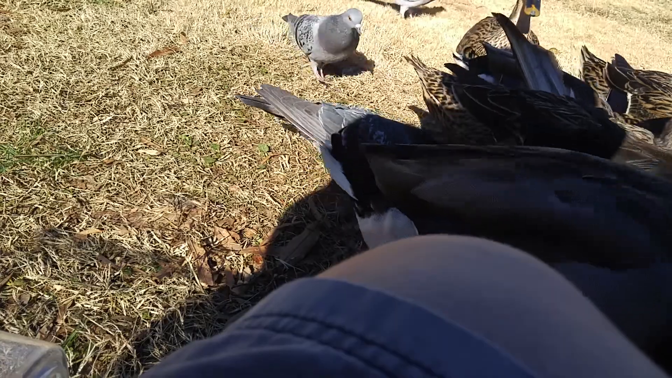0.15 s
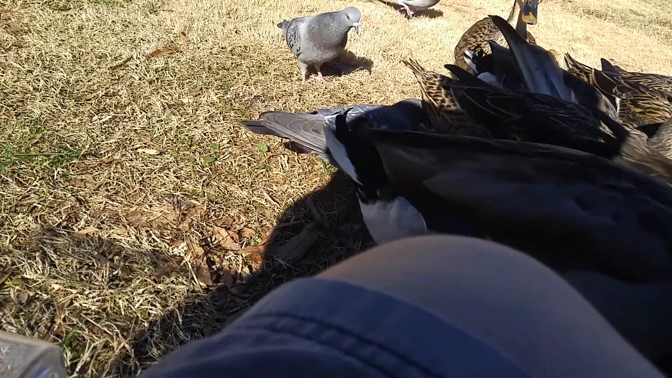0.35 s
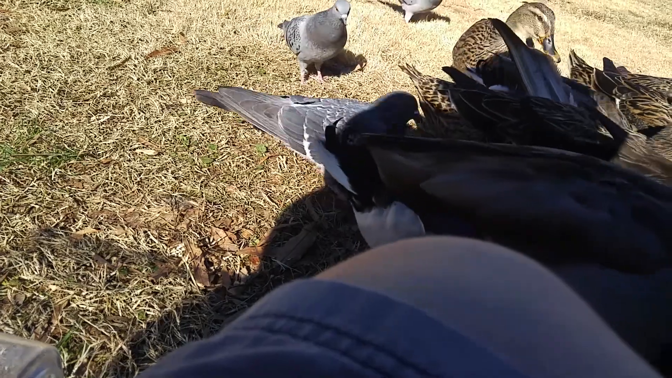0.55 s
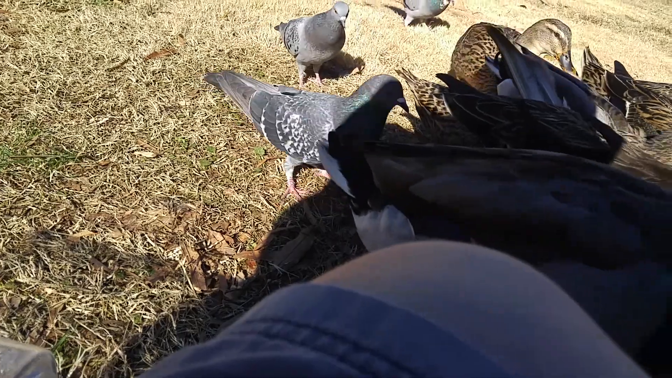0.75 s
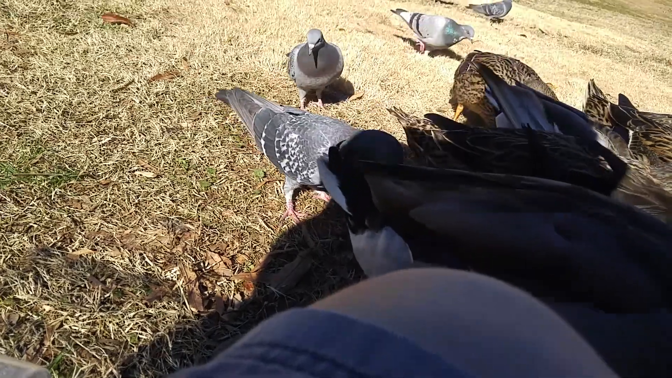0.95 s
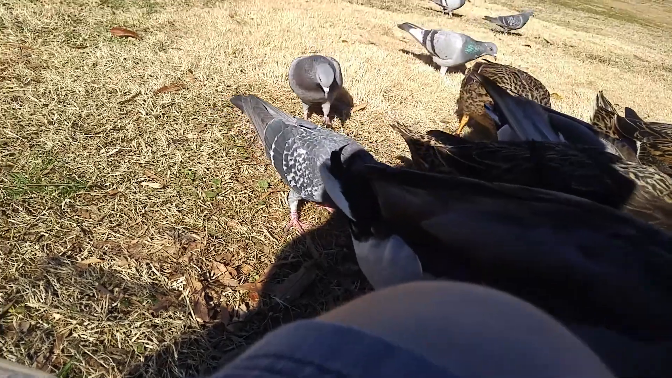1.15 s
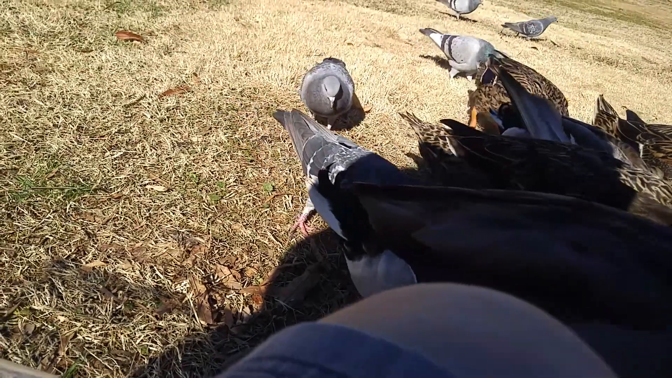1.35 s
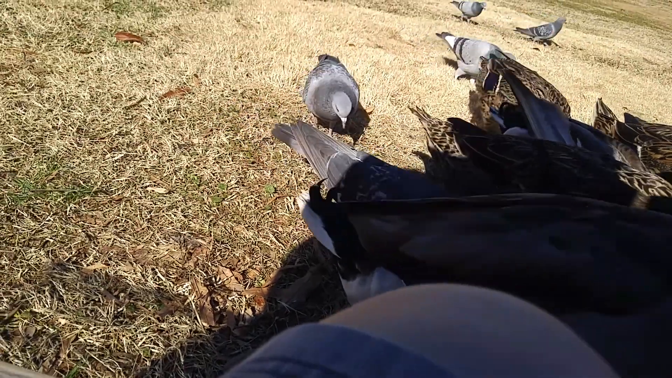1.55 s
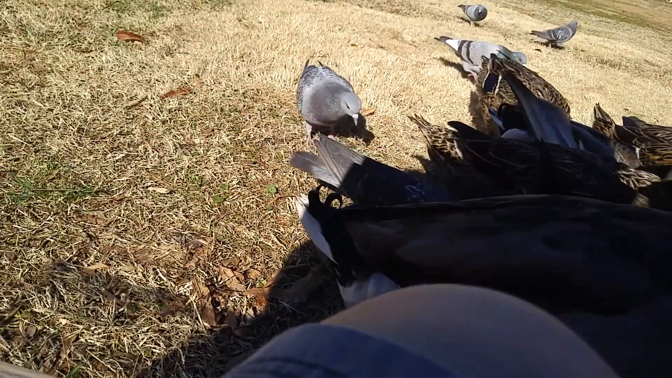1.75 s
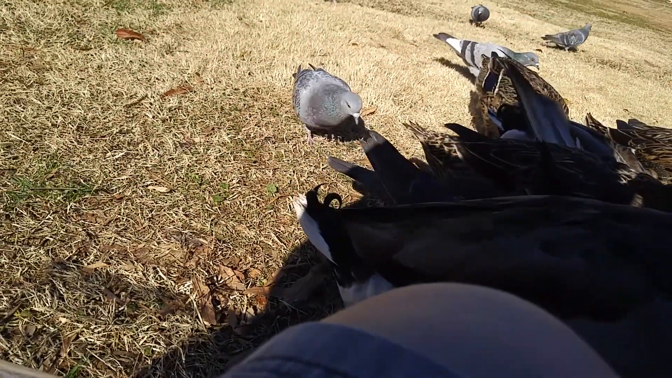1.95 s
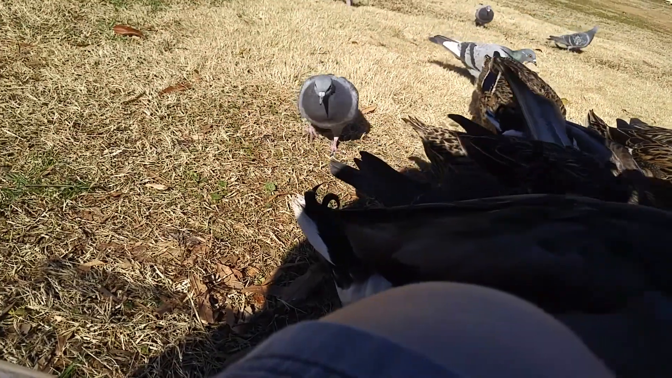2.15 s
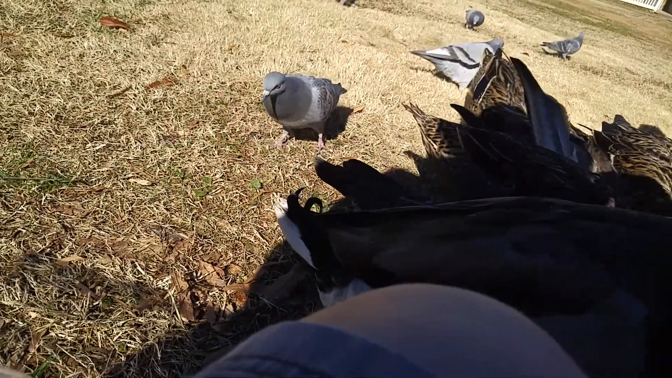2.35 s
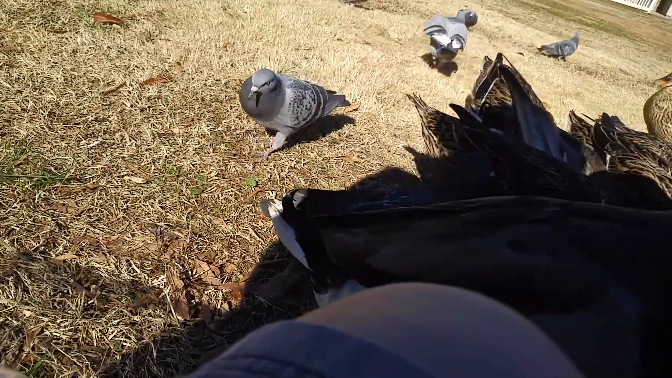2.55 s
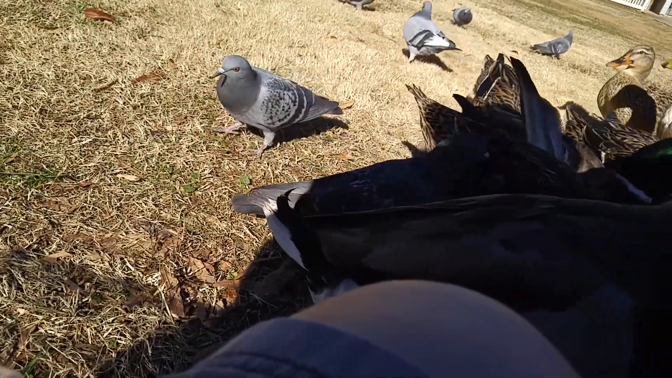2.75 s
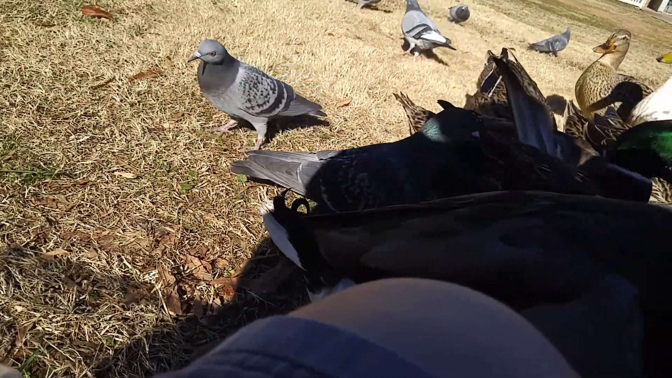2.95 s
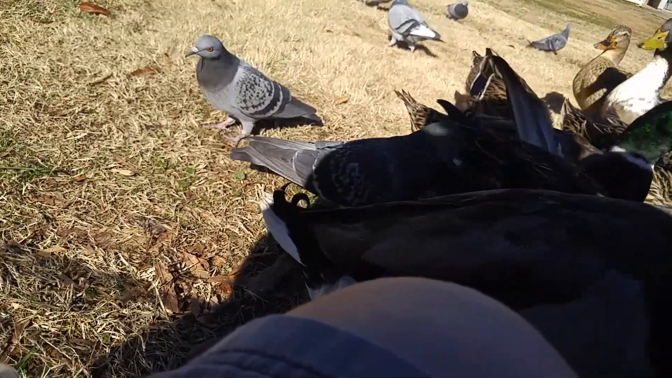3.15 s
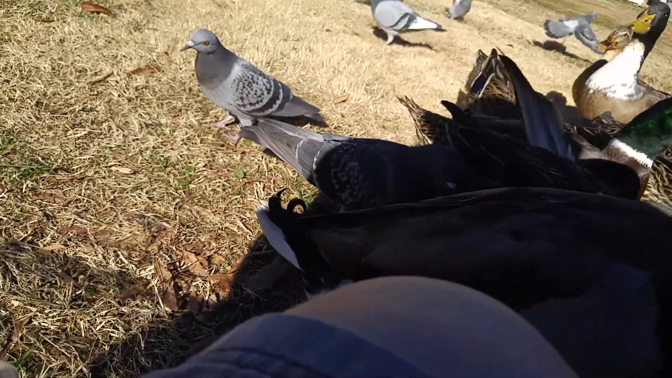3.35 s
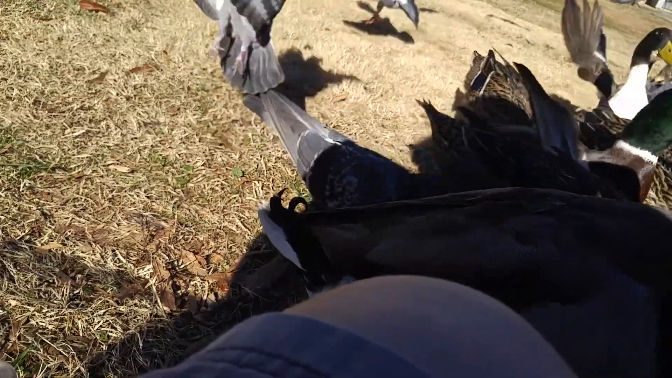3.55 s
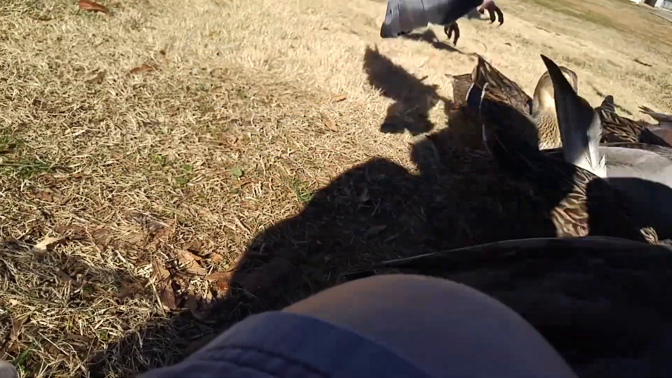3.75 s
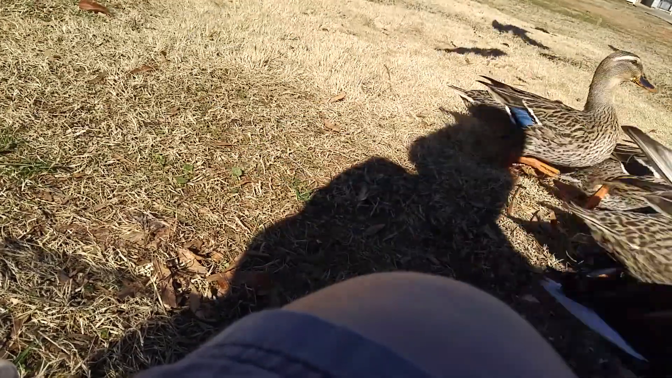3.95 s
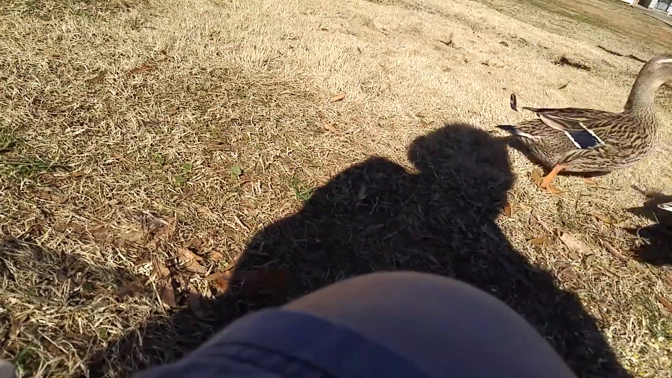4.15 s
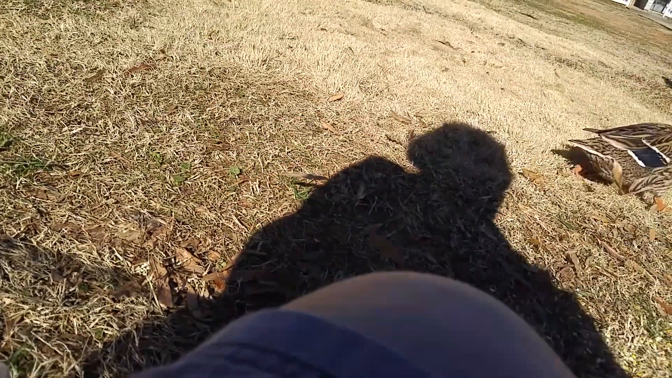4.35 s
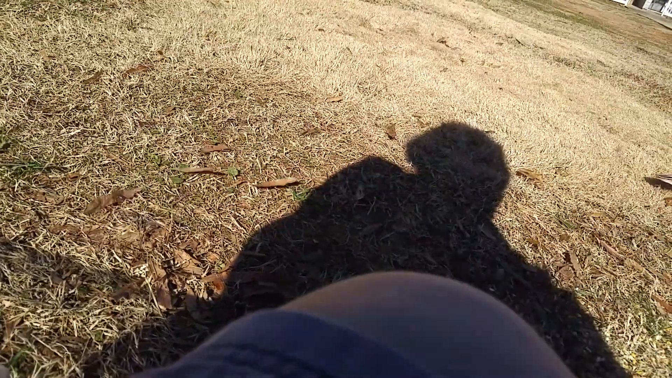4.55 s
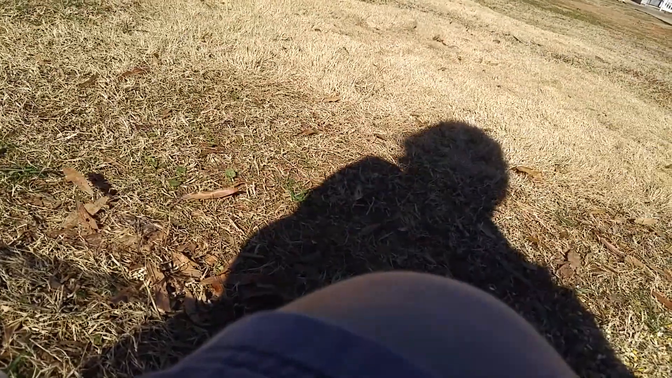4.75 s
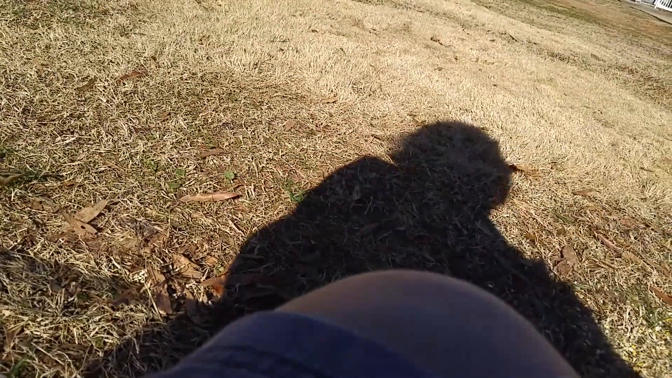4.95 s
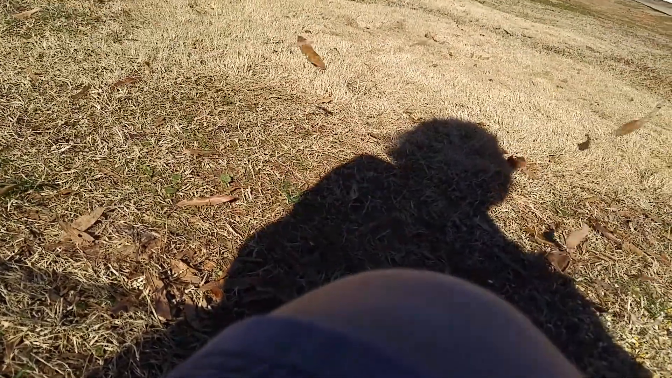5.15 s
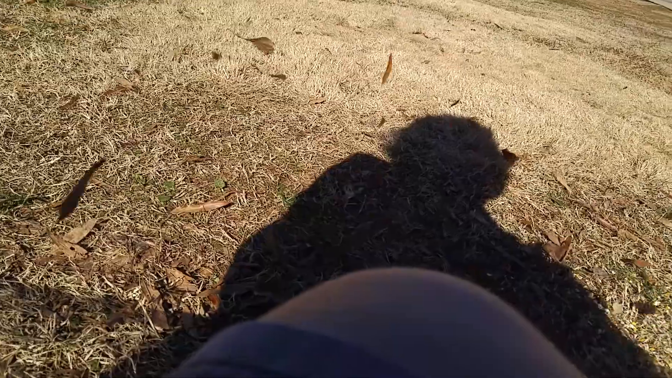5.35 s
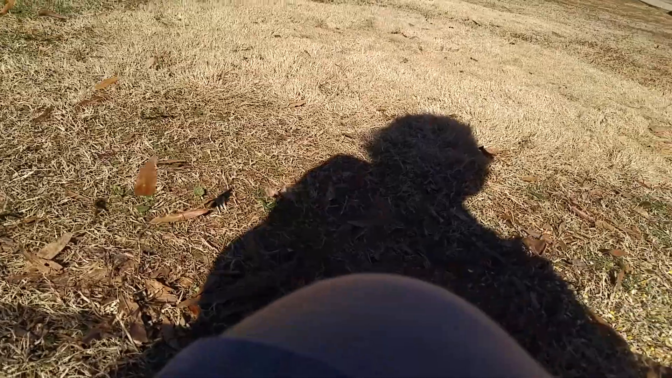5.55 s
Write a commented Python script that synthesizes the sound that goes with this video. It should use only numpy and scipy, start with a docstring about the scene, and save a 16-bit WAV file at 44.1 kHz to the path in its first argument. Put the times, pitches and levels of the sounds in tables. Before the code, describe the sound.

Quiet close-up duck chatter and pecking in dry stalks, suddenly broken by waves of loud wingbeats buffeting the microphone.

```python
"""Ducks, feeding with pigeons on dry grass right beside the microphone, a little to its right, call softly.
Pulsed throats grunt, plunging tones cluck, gliding whistles squeak and runs of chirps chatter; noise snaps
make bills and feet tick in the stalks, and a thin tone is a small bird whistling once, far off.
Then the flock bolts in three waves: shaped noise puffs and claps from the wings, rustles from feathers
and grass, and buffets the microphone with downdraught."""
import sys
import numpy as np
from scipy import signal
from scipy.fft import rfft, irfft
from scipy.io import wavfile

SR = 44100
rng = np.random.default_rng(int(sys.argv[2]) if len(sys.argv) > 2 else 0)


def int16_out(signal):
    """Quantize to a 16-bit WAV file."""
    q = np.round(np.clip(np.atleast_2d(signal).T, -1, 1) * 32767)
    wavfile.write(sys.argv[1], SR, q.astype(np.int16))


N = 246519
T = np.arange(N) / SR  # time [s]

# Levels in the tables are relative: the layers and the microphone scale them further.
# Outdoor background: (frequency [Hz], level [dB])
AIR_SPECTRUM = [(25, -30), (65, 3.5), (190, -5), (400, -1.5), (760, -6.5), (1150, -21.5), (2200, -29),
                (3200, -35), (6000, -30), (15000, -40.5)]
# One far whistle: (time [s], length [s])
FAR_WHISTLE = (1.89, 0.19)
# Likeness of the left and right ports: (frequency [Hz], likeness [0-1])
PORT_LIKENESS = [(50, 0.98), (350, 0.87), (700, 0.83), (1100, 0.1), (2500, 0.45), (6000, 0.023)]
# Dry grass: (frequency [Hz], level [dB])
GRASS_SPECTRUM = [(1000, 3), (2400, -8.5), (3400, -8), (5600, -3.5), (7900, 1), (8500, 5), (10000, -2.5),
                  (12000, -12), (16000, -16)]
# A bird shuffles in the grass: (time of the height [s], rise [s], fall [s], level [dB])
SCUFFLES = [(0.81, 0.034, 0.2, -46), (1.19, 0.027, 0.21, -48.5)]
# The sharpest pecks and snapping stalks: (time [s], level [dB])
PECKS = [(1.0185, -31), (1.706, -33.5), (2.7785, -28), (3.326, -22.5), (3.483, -24.5)]
# A bird slides its feathers: (time of the height [s], half length [s], level [dB])
RUFFLE = (2.49, 0.063, -36.5)
# The flock leaves in three waves: (time of the height [s], rise [s], fall before each layer's linger [s],
# downdraught level [dB], wing rush level [dB], feather swish level [dB], grass rustle level [dB])
WAVES = [(3.77, 0.12, 0.73, -25, -24, -38.5, -28), (4.28, 0.081, 0.26, -25.5, -33, -38.5, -49),
         (4.8, 0.2, 0.65, -26, -19.5, -33.5, -39)]
# Path of the flock, ending on the right: (time [s], left over right in the treble [dB], left port delay [ms])
FLOCK_PATH = [(3.9, 1, -0.097), (4.3, -2.5, -0.12), (4.8, 1.5, 0.281), (5.5, -11.5, 0.31)]
# Downdraught on the microphone: (frequency [Hz], level [dB])
DRAUGHT_SPECTRUM = [(20, -19), (55, 2.5), (110, -3), (400, -8.5), (1000, -39)]
# Hollow rush of wings: (frequency [Hz], level [dB])
RUSH_SPECTRUM = [(120, -21), (260, -2.5), (370, 5.5), (780, -1), (1000, -13), (1300, -21), (2400, -30),
                 (5000, -34.5)]
# Feather swish: (frequency [Hz], level [dB])
FEATHER_SPECTRUM = [(200, 15), (750, 8.5), (1500, -6.5), (2600, 5), (3500, -5.5), (5500, 3), (8600, 4),
                    (11000, -2.5), (16000, -12)]
# Dull flap of a wing: (frequency [Hz], level [dB])
FLAP_SPECTRUM = [(250, -3), (800, 5.5), (1250, -6.5), (2300, -13.5), (3500, -27), (16000, -32)]
# Downstrokes of the nearest birds: (time [s], level [dB], pitch of the puff [Hz])
STROKES = [(3.549, -21, 450.8), (3.801, -11.5, 347), (3.838, -5.5, 786), (3.891, -3.5, 690),
           (3.936, -9, 404), (3.99, -4, 755), (4.14, -15, 725), (4.245, -15, 400), (4.546, -6, 324),
           (4.616, -14, 388), (4.655, -16.5, 705), (4.838, -9, 320), (4.862, -7.5, 300),
           (4.988, -9.5, 351.6), (5.003, -5, 383), (5.103, -2, 369), (5.199, -6, 354.8), (5.294, -5.5, 397),
           (5.367, -9.5, 390), (5.468, -11, 376), (5.563, -10, 396)]
# Rough flaps of wings brushing past other birds: (time [s], level [dB])
FLAPS = [(3.776, -14), (3.796, -10.5), (3.839, -13), (3.988, -12), (4.008, -11), (4.245, -17),
         (4.549, -17.5), (4.709, -11), (4.861, -13), (4.965, -14), (4.987, -10.5), (5.285, -13)]
# The loudest wing-tip claps: (time [s], level [dB])
CLAPS = [(3.7502, -13), (3.7935, -4), (3.9078, -7), (4.0089, -4), (4.3835, -16), (4.5344, -14.5),
         (4.5512, -12.5), (4.5787, -12.5), (4.7096, -5), (4.7464, -4), (4.7648, -10), (4.8638, -11),
         (4.9911, -12), (5.015, -8.5), (5.2087, -14.5)]
# Which side the calling ducks are on: (time [s], left over right [dB])
DUCK_BEARING = [(0.79, 2), (0.87, -16), (0.89, -2), (3.5, 0)]
# Duck throat: (frequency [Hz], level [dB])
THROAT = [(250, -45), (480, 1.5), (680, 7.5), (1250, -6.5), (1600, 2), (2000, -9.5), (2500, -12),
          (3200, -20), (4300, -10), (5000, -26), (12000, -31)]
# Feeding chatter: (time [s], length [s], level [dB], centre pitch before the arch [Hz])
CHATTER = [(1.053, 0.075, -33, 1888), (1.38, 0.046, -42.5, 1830), (1.425, 0.069, -38, 2214),
           (1.582, 0.052, -45.5, 1744), (2.256, 0.12, -35.5, 1903), (2.517, 0.06, -37.5, 1813),
           (2.691, 0.04, -43, 1760), (2.787, 0.062, -34.5, 2210), (3.062, 0.084, -36, 1500),
           (3.213, 0.05, -43, 1910)]
# Squeaks, alone or leading into a grunt: (time [s], length [s], level [dB], pitch before the swoop [Hz])
SQUEAKS = [(0.679, 0.037, -41.5, 1393), (0.718, 0.041, -33, 998), (1.756, 0.019, -26, 1072),
           (2.073, 0.024, -23.5, 1053), (2.364, 0.057, -31, 866), (2.614, 0.019, -31.5, 987),
           (2.942, 0.0214, -27, 1025), (3.017, 0.043, -31.5, 904), (3.334, 0.024, -31, 965)]
# Clucks: (time [s], level [dB], starting pitch [Hz])
CLUCKS = [(0.821, -8.5, 760), (0.867, -16, 1180), (.981, -17, 1220), (1.845, -20, 1120),
          (1.898, -15.5, 1210), (2.002, -14, 1150), (2.166, -6, 1395), (3.295, -10, 1370)]
# Low duck grunts: (time [s], length [s], level [dB], pitch before the dip [Hz],
# rasp against the fundamental [dB], mouth resonance mid-call [Hz])
GRUNTS = [(0.553, 0.042, -31, 280, -10, 1170), (0.879, 0.084, -28, 306.6, -11.5, 780),
          (1.162, 0.064, -25.5, 308.4, -13.5, 990), (1.767, 0.02, -20.5, 376, -5.5, 850),
          (2.083, 0.034, -14, 331.7, -2, 680), (2.118, 0.019, -21.5, 275.4, -2, 990),
          (2.483, 0.015, -27.5, 332, 3, 1900), (2.619, 0.037, -22.5, 375, -17.5, 1370),
          (2.648, 0.043, -24.5, 325, -14, 740), (2.865, 0.075, -20.5, 287, -15, 676),
          (2.932, 0.0584, -20, 302.7, -16.5, 1390), (3.028, 0.034, -24.5, 373.4, -14.5, 910),
          (3.297, 0.017, -17, 338, -19, 1060), (3.347, 0.034, -19.5, 275.5, -11, 1050),
          (3.664, 0.077, -21.5, 293.8, -12, 740)]


def amp(db):
    """Decibels to gain."""
    return 10 ** (np.asarray(db) / 20)


def unit(x):
    """Scales to rms 1."""
    return x / np.sqrt(np.mean(x ** 2) + 1e-20)


def read(points, hz):
    """Reads a spectrum table on a log-frequency axis."""
    f, value = np.transpose(points)
    return np.interp(np.log(hz + 1), np.log(f + 1), value)


def add(mix, s, sound):
    """Mixes a sound in at time s [s]."""
    part = mix[..., round(s * SR):][..., :sound.shape[-1]]
    part += sound[..., :part.shape[-1]]


def colour(x, spectrum):
    """Filters by a spectrum table without shifting phase."""
    gain = amp(read(spectrum, np.fft.rfftfreq(x.shape[-1], 1 / SR)))
    return irfft(rfft(x) * gain, x.shape[-1])


def ring(x, spectrum):
    """Causal minimum-phase filter: each pulse rings on after it strikes."""
    log_gain = np.log(amp(read(spectrum, abs(np.fft.fftfreq(2048, 1 / SR)))))
    response = np.fft.ifft(np.exp(np.conj(signal.hilbert(log_gain)))).real
    return signal.fftconvolve(x, response)[:len(x)]


def resonate(x, hz, width):
    """A resonance of the given width [Hz] that follows the curve hz."""
    turn = np.exp(2j * np.pi * np.cumsum(hz) / SR)
    r = np.exp(-np.pi * width / SR)
    centred = signal.lfilter([1], [1, -2 * r, r * r], x / turn)
    return unit((turn * centred).real)


def noise(spectrum, size=N):
    """Coloured noise at two ports, alike in the bass and nearly unrelated at the top of the treble."""
    a, b = rfft(rng.standard_normal((2, size)))
    same = np.clip(read(PORT_LIKENESS, np.fft.rfftfreq(size, 1 / SR)), 0, 1)
    ports = irfft([a, same * a + np.sqrt(1 - same ** 2) * b], size)
    return unit(colour(ports, spectrum))


def wander(hz, size=N):
    """Random drift of about rms 1, moving up to about hz times a second."""
    knots = rng.standard_normal(8192)
    return 1.2 * np.interp(np.arange(size) / SR * hz * 2, np.arange(len(knots)), knots)


def arch(u):
    """Rises and falls once as u goes from 0 to 1; zero on average."""
    return np.sin(np.pi * u) - 2 / np.pi


def syllable(length, edge):
    """Time [s], progress 0-1 and a soft-edged envelope for one call."""
    t = np.arange(max(round(length * SR), 64)) / SR
    return t, t / t[-1], signal.windows.tukey(len(t), min(edge, 1))


def burst(sound, envelope):
    """Shapes a noise, with rms 1 at the top of the envelope."""
    return unit(sound * envelope) / unit(envelope).max()


def swell(rows, level_column, linger=1):
    """Surges that build quickly and die away, added in power; linger stretches their fall."""
    power = np.zeros(N)
    for row in rows:
        s, rise, fall = row[:3]
        before = abs((T - s) / rise) ** 1.17
        after = (T - s) / (fall * linger)
        power += (amp(row[level_column]) * np.exp(-np.where(T < s, before, after))) ** 2
    return np.sqrt(power)


def sprinkle(start, end, per_s, db, spread_db):
    """Rows (time [s], level [dB]) of small events, one at a random moment in each equal slot."""
    place, size = rng.random((64, 2)).T
    times = start + (np.arange(len(place)) + place) / per_s
    levels = db + spread_db * (2 * size - 1)
    return [(s, d) for s, d in zip(times, levels) if s < end]


def snaps(rows, spectrum, decay, tail_db, tail):
    """Sharp noise cracks of wing or bill, each with a short scraping tail (decays [s])."""
    out, t = np.zeros((2, N)), np.arange(2048) / SR
    attack = (1 - np.exp(-t / 0.00086)) ** 2
    envelope = attack * (np.exp(-t / decay) + amp(tail_db) * np.exp(-t / tail))
    for s, db in rows:
        add(out, s, amp(db - 3.0) * burst(noise(spectrum, size=len(t)), envelope))
    return out


def outdoor_air(db=-34.5, from_s=0.5, rise_s=0.2):
    """The outdoor background: coloured noise that fades in and wavers in level."""
    fade = np.clip((T - from_s) / rise_s, 0, 1)
    return amp(db) * fade * noise(AIR_SPECTRUM) * amp(2.2 * wander(14))


def songbird(db=-58, hz=8220, waver=0.0081):
    """One thin, high whistle from a small bird far off: a sine of slightly wavering pitch."""
    out, (s, length) = np.zeros(N), FAR_WHISTLE
    t, _, envelope = syllable(length, 0.62)
    phase = 2 * np.pi * np.cumsum(hz * (1 + waver * wander(310, len(t)))) / SR
    add(out, s, amp(db) * envelope * unit(np.sin(phase)))
    return out


def rustle(per_s=400, spread_db=5.0, smooth_db=0, decay_s=0.00095):
    """Dry stalks: many tiny snaps of uneven size over a smooth swish."""
    size = amp(spread_db * np.minimum(rng.exponential(1, N), 4)) * (rng.random(N) < per_s / SR)
    power = signal.lfilter([1], [1, -np.exp(-1 / (decay_s * SR))], size ** 2)
    return unit(noise(GRASS_SPECTRUM) * (unit(np.sqrt(power)) + amp(smooth_db)))


def grass(stir_db=-55, stir_from_s=0.81, stir_rise_s=0.13):
    """Feet and bills keep stirring the stalks; scuffles and the take-off waves swell the rustle."""
    stir = amp(stir_db) * np.exp(-(np.minimum(T - stir_from_s, 0) / stir_rise_s) ** 2)
    scuffles = swell(SCUFFLES, level_column=3)
    take_off = swell(WAVES, level_column=6, linger=1.1)
    trampling = np.sqrt(stir ** 2 + scuffles ** 2 + take_off ** 2)
    return trampling * rustle() * amp(3.8 * wander(25))


def pecks():
    """Bills and snapping stalks tick: the sharpest at set times, fainter ones at random."""
    faint = sprinkle(0.98, 3.65, per_s=4, db=-36.5, spread_db=2.5)
    return snaps(list(PECKS) + faint, GRASS_SPECTRUM, decay=0.00097, tail_db=-24.5, tail=0.0095)


def ruffle():
    """One smooth, bright swish of noise as feather slides over feather."""
    s, half, db = RUFFLE
    return amp(db) * np.exp(-((T - s) / half) ** 2) * noise(GRASS_SPECTRUM)


def gust(s=4.02, db=-12, decay=0.088, eddy_db=-11, eddy_decay=0.54):
    """One bird's wake hits the left port alone and leaves eddies behind (decays [s])."""
    t = np.maximum(T - s, 0)
    envelope = np.minimum(t / 0.0023, 1) * (np.exp(-t / decay) + amp(eddy_db) * np.exp(-t / eddy_decay))
    buffet = noise([(35, -40), (85, 2.5), (250, -6.0), (700, -12.0), (3000, -57)])
    return amp(db) * envelope * buffet * [[1], [0]]


def downdraught(eddy_db=2):
    """Air shoved down by the wings buffets each port with its own eddies."""
    eddies = amp(eddy_db * np.array([wander(20), wander(14)]))
    return swell(WAVES, level_column=3, linger=0.96) * noise(DRAUGHT_SPECTRUM) * unit(eddies)


def wing_rush():
    """The rush of many wings: hollow noise that throbs at random."""
    return swell(WAVES, level_column=4, linger=1.84) * noise(RUSH_SPECTRUM) * amp(2 * wander(28))


def crackle(per_s=320, spread_db=5.0, low_hz=2000, high_hz=10000, decay=0.0011):
    """Single quills and stalks snapping: decaying noise grains rung in ten colours."""
    out, t = np.zeros((2, N)), np.arange(512) / SR
    centres = np.geomspace(low_hz, high_hz, 10)
    for hz in centres:
        struck = rng.random(N) < per_s / len(centres) / SR
        size = amp(spread_db * np.minimum(rng.exponential(1, N), 3)) * struck
        for port in out:
            grain = rng.standard_normal(len(t)) * np.exp(-t / decay)
            snap = resonate(grain, np.full(len(t), hz), hz)
            port += signal.oaconvolve(size, snap)[:N]
    return unit(colour(out, FEATHER_SPECTRUM))


def flutter(low_hz=1500, high_hz=8000, focus_db=7, rattle_db=5.0, quill_db=0, count=4,
            beats_per_s=9, fade_db=22):
    """Birds beat out of step; each downstroke rattles vanes and quills in its own colour, then fades."""
    out = np.zeros((2, N))
    for hz in np.geomspace(low_hz, high_hz, count):
        pace = beats_per_s * (1 + wander(1.993) / 10)
        cycle = (np.cumsum(pace) / SR + rng.random()) % 1
        beat = np.minimum(cycle * 10, 1) * amp(2 * wander(beats_per_s) - fade_db * cycle)
        vanes = unit(noise(FEATHER_SPECTRUM) * amp(rattle_db * wander(260)))
        focus = [(f, -focus_db * abs(np.log2(f / hz))) for f, _ in FEATHER_SPECTRUM]  # dB per octave
        out += colour(beat * (vanes + amp(quill_db) * crackle()), focus)
    return unit(out)


def strokes(length=0.0032, focus_db=7, swish_db=-17, far_hz=640, far_octaves=0.59, far_db=-16.5):
    """Downstrokes shove out hollow puffs of air while feathers swish; farther birds beat at random."""
    out, t = np.zeros((2, N)), np.arange(4096) / SR
    envelope = t ** 2 * np.exp(-t / length)
    far = [(s, db, far_hz * 2 ** (far_octaves * (2 * rng.random() - 1)))
           for s, db in sprinkle(4.05, 5.59, per_s=10, db=far_db, spread_db=5.5)]
    for s, db, hz in list(STROKES) + far:
        body = [(f, d - focus_db * abs(np.log2(f / hz))) for f, d in RUSH_SPECTRUM]
        puff = noise(body, size=len(t)) + amp(swish_db) * noise(FEATHER_SPECTRUM, size=len(t))
        add(out, s - .002, amp(db - 4.0) * burst(puff, envelope))
    return out


def wing_claps(aloft_s=4.495, whip_db=-2, clap_db=1):
    """At first the wing tips whip the grass, later they meet each other: noise cracks change colour."""
    aloft = np.clip((T - aloft_s) / 0.33, 0, 1)
    whips = amp(whip_db) * snaps(CLAPS, GRASS_SPECTRUM, decay=0.0019, tail_db=-30, tail=0.0069)
    claps = amp(clap_db) * snaps(CLAPS, FEATHER_SPECTRUM, decay=0.00066, tail_db=-33.0, tail=0.021)
    return np.sqrt(1 - aloft) * whips + np.sqrt(aloft) * claps


def flock(flutter_db=2):
    """Wings beat out of step past the microphone; side shading and a delay at the left port place them."""
    feathers = amp(flutter_db) * swell(WAVES, level_column=5, linger=0.83) * flutter()
    treble = feathers + wing_claps()
    s, side_db, lag_ms = np.transpose(FLOCK_PATH)
    shade = amp(np.interp(T, s, side_db) * np.array([[.5], [-.5]]))  # only the treble is shaded
    flaps = snaps(FLAPS, FLAP_SPECTRUM, decay=0.0055, tail_db=-14, tail=0.024)
    left, right = downdraught() + wing_rush() + strokes() + flaps + shade * treble
    return np.array([np.interp(T - np.interp(T, s, lag_ms) / 1000, T, left), right])


def chatter(rate=92, sweep=0.46, scatter=0.141, under_db=-5, body_db=-4, fuzz_db=-4, lift=0.293):
    """An uneven rattle of tiny rising chirps on three partials with a breathy rasp; pitch arches per run."""
    out = np.zeros(N)
    for s, length, db, hz in CHATTER:
        t, u, envelope = syllable(length, 0.54)
        cycle = np.cumsum(rate * (1 + 0.314 * wander(rate, len(t)))) / SR % 1
        centre = hz * np.exp(lift * arch(u))
        pitch = centre * np.exp(sweep * (cycle - .5) + scatter * wander(401, len(t)))
        phase = 2 * np.pi * np.cumsum(pitch) / SR
        tones = np.sin(phase) + amp(under_db) * np.sin(phase * 2 / 3) + amp(body_db) * np.sin(phase / 3)
        chirps = unit(np.sin(np.pi * cycle) ** 4 * tones * amp(2 * wander(rate, len(t))))
        breath = rng.standard_normal(len(t))
        fuzz = amp(fuzz_db) * unit(unit(ring(breath, THROAT)) + resonate(breath, centre, hz / 2))
        add(out, s, amp(db) * envelope * unit(chirps + fuzz))
    return out


def squeaks(jitter=0.045, overtone_db=-13, sag=0.14, dip=0.32, breath_db=-12):
    """Short breathy whistles that swoop down and turn up again."""
    out = np.zeros(N)
    for s, length, db, hz in SQUEAKS:
        t, u, envelope = syllable(length, 0.79)
        pitch = hz * (1 + sag * (.5 - u) - dip * arch(u) + jitter * wander(233, len(t)))
        phase = 2 * np.pi * np.cumsum(pitch) / SR
        tone = unit(sum(amp(overtone_db * np.log2(k)) * np.sin(k * phase) for k in range(1, 5)))
        breath = unit(ring(rng.standard_normal(len(t)), THROAT))
        add(out, s, amp(db) * envelope * (tone + amp(breath_db) * breath))
    return out


def clucks(time_scale_s=0.00394, rest_hz=270, plunge=1.42, overtone_db=-22, snap_db=-23):
    """The syrinx snaps open and its pitch plunges within a few cycles."""
    out, t = np.zeros(N), np.arange(2048) / SR
    u = t / time_scale_s
    envelope = u ** 2 * np.exp(-u * 2.19)
    envelope /= envelope.max()
    for s, db, hz in CLUCKS:
        phase = 2 * np.pi * np.cumsum(rest_hz + (hz - rest_hz) * np.exp(-u * plunge)) / SR
        overtone = amp(overtone_db) * envelope * np.sin(2 * phase)
        puff = amp(snap_db) * unit(ring(rng.standard_normal(len(t)), FLAP_SPECTRUM))  # as dull as a flap
        add(out, s, amp(db) * envelope * (np.sin(phase) + overtone + puff))
    return out


def grunts(sag=0.122, dip=0.2, jitter=0.0596, hoarse=0.54, growl=0.45, opening=0.29,
           mouth_width_hz=380, mouth_db=1, strain=0.7):
    """A strong dipping fundamental; strong and weak pulses in turn rasp through throat and opening mouth."""
    out = np.zeros(N)
    for s, length, db, hz, rasp_db, mouth_hz in GRUNTS:
        t, u, envelope = syllable(length, 0.65)
        pitch = hz * (1 + sag * (.5 - u) - dip * arch(u) + jitter * wander(197.2, len(t)))
        turns = np.cumsum(pitch) / SR
        pulses = sum(np.cos(2 * np.pi * (k * turns + rng.random())) for k in range(2, 18))
        puffs = rng.standard_normal(len(t)) * np.exp(-(turns % 1))
        alternation = 1 + growl * np.cos(np.pi * turns)
        drive = ((1 - hoarse) * unit(pulses) + hoarse * unit(puffs)) * alternation
        mouth = resonate(drive, mouth_hz * (1 + opening * (u - .5)), mouth_width_hz)
        # quieter calls excite the top resonance less
        throat = [(f, d + (f > 4000) * strain * (db + 8.5)) for f, d in THROAT]
        rasp = unit(unit(ring(drive, throat)) + amp(mouth_db) * mouth)
        rasp *= 2 * envelope  # harshest at the height of the call
        fundamental = np.sqrt(2) * np.cos(2 * np.pi * turns)
        voice = amp(2 * wander(67.0, len(t))) * (fundamental + amp(rasp_db) * rasp)
        add(out, s, amp(db) * envelope * unit(voice))
    return out


def nearby(x, lag=0.00016, scatter_db=-17, decay=0.028):
    """Sound reaches the left port late, its balance set by bearing; bodies and ground scatter a little."""
    t = np.arange(2048) / SR
    taps = rng.standard_normal((2, len(t))) * np.exp(-t / decay)
    echoes = signal.oaconvolve(x[None], taps / np.linalg.norm(taps[0]), axes=1)[:, :N]
    sides = amp(np.interp(T, *np.transpose(DUCK_BEARING)) * np.array([[.5], [-.5]]))
    return np.array([np.interp(T - lag, T, x), x]) * sides + amp(scatter_db) * echoes


def scene():
    """Ducks feeding close by over the outdoor background, then the take-off."""
    ground = (grass() + pecks()) * amp([[1.2], [-2.2]])  # left and right gain [dB]
    background = outdoor_air() + songbird()
    ducks = nearby(chatter() + squeaks() + clucks() + grunts())
    return background + ground + ruffle() + gust() + flock() + ducks


def record(dry, open_s=0.48, notch_hz=510, notch_q=2.84, low_cut_hz=42, edge_hz=16000):
    """The input opens from silence; the microphone sheds rumble, has a low-mid hollow and a treble limit."""
    opened = dry * np.clip((T - open_s) / 0.047, 0, 1) ** 2
    hollow = signal.lfilter(*signal.iirnotch(notch_hz, notch_q, SR), opened)
    mic = signal.sosfilt(signal.butter(4, low_cut_hz, "high", fs=SR, output="sos"), hollow)
    band_limit = signal.firwin(255, edge_hz, window=("kaiser", 8), fs=SR)
    return signal.oaconvolve(mic, band_limit[None], "same")


dry = scene()
out = record(dry)
int16_out(out)
```